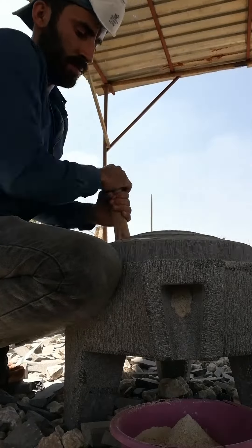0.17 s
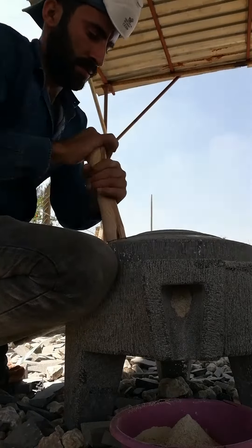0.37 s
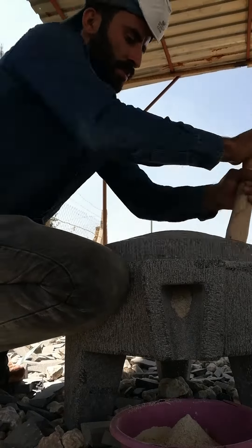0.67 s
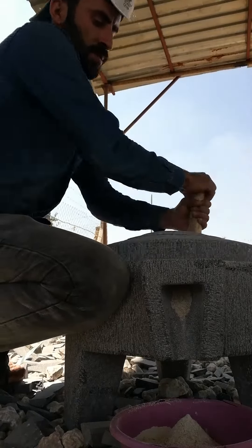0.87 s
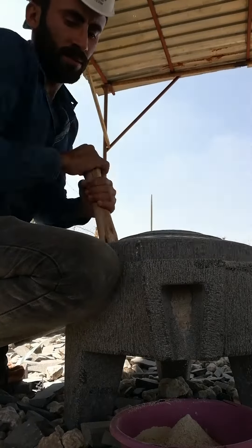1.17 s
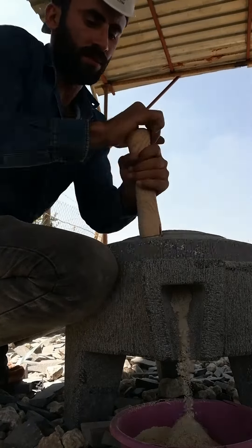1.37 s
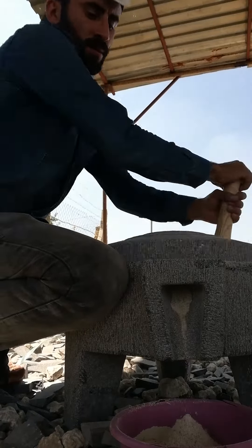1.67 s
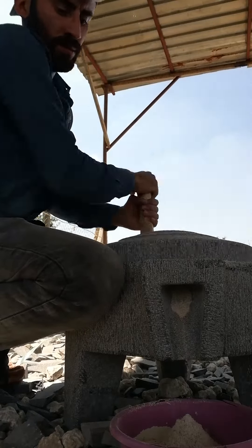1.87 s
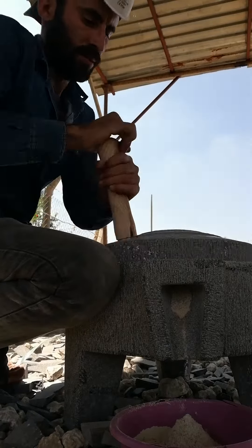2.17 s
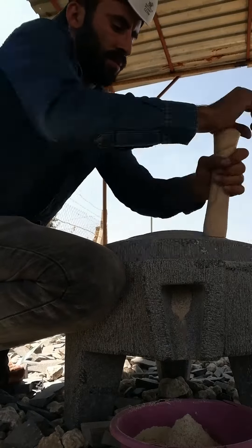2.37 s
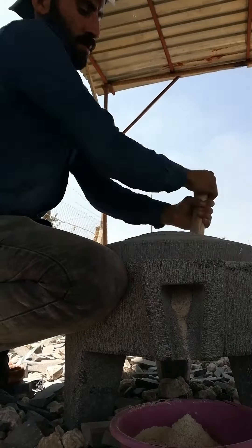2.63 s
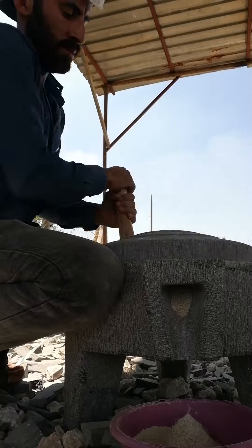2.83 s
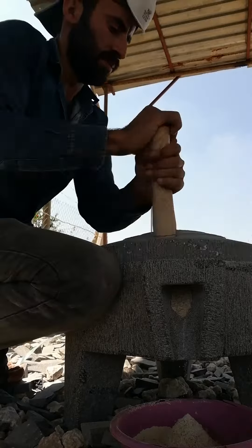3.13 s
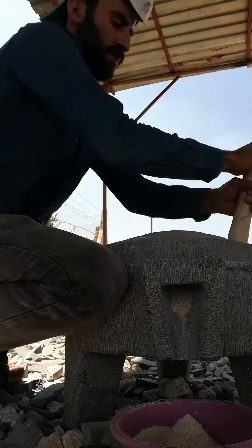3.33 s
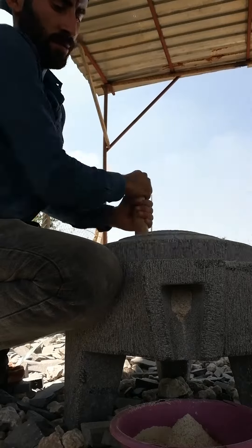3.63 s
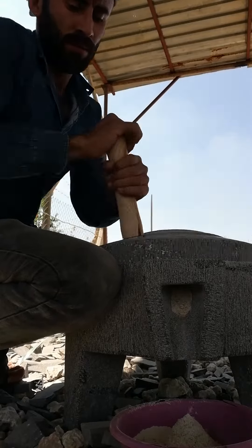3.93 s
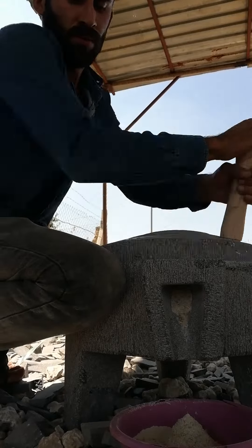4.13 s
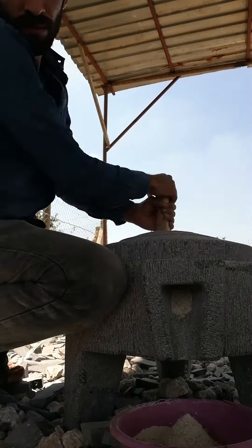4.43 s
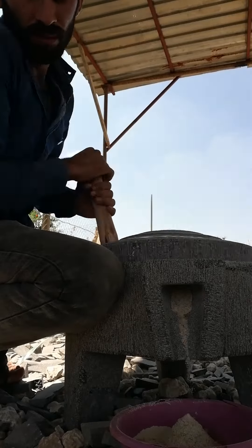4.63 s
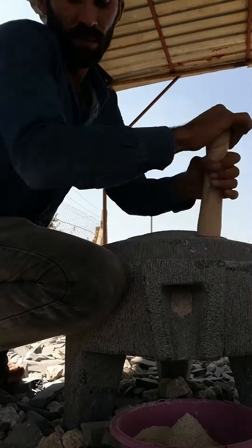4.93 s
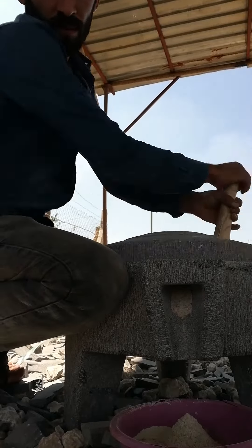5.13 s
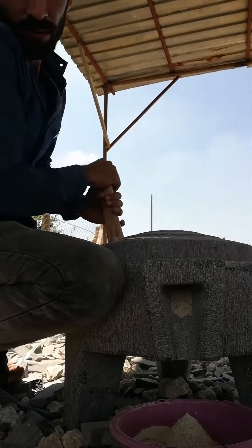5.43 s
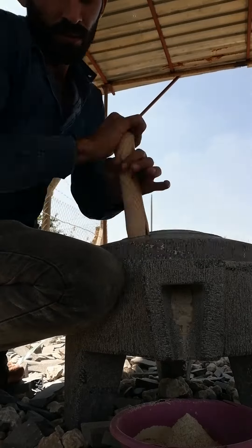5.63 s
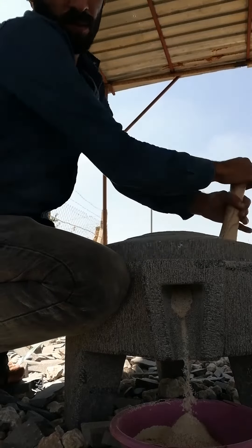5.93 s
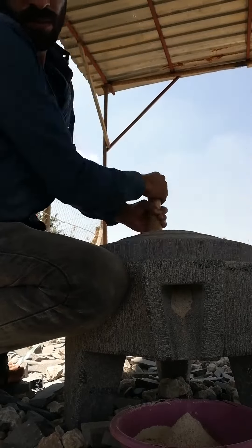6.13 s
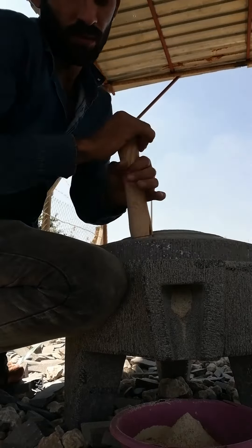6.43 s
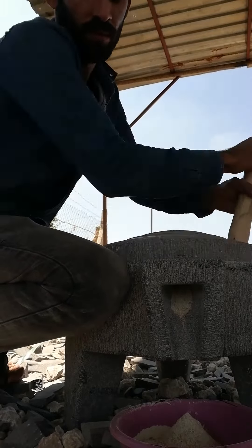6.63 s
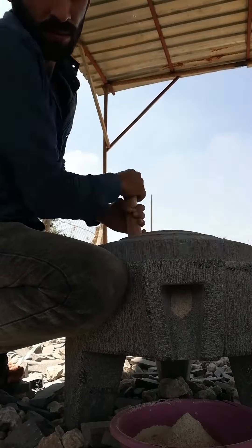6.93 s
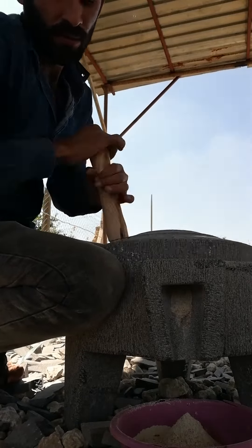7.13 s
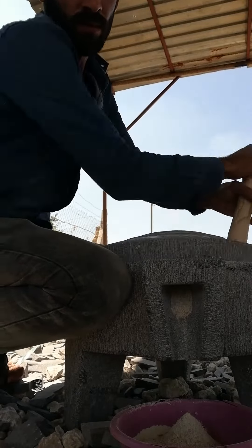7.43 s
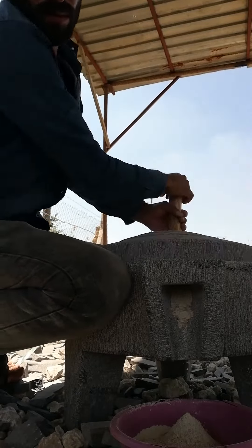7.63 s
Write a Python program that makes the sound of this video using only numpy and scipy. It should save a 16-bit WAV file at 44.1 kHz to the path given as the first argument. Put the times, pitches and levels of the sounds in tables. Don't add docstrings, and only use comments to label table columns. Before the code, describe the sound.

A heavy stone hand mill is cranked steadily, about one turn every 0.8 seconds. Each push and pull brings a swell of coarse, crunchy grinding, hollow low thuds and sharp kernel cracks. Thin stone tones sing unevenly above, a loose pivot ticks once a turn, and fine meal hisses. Close stereo microphones, open shelter, dry with no obvious echo.

```python
import sys
import numpy as np
from scipy import signal
from scipy.fft import rfft, irfft, next_fast_len
from scipy.io import wavfile
from scipy.ndimage import uniform_filter1d

SR = 44100
rng = np.random.default_rng(int(sys.argv[2]) if len(sys.argv) > 2 else 0)


def to_wav(sig):
    pcm = np.clip(np.atleast_2d(sig), -1, 1) * 32767
    pcm = np.round(pcm).astype(np.int16)
    wavfile.write(sys.argv[1], SR, pcm.T)


def volts_from_decibels(level):
    exponent = np.asarray(level, float) / 20
    return 10 ** exponent


N = 343980

# t/s, peak level/dB, thud re peak/dB, bright snap re peak/dB
KERNEL_CRACKS = [(0.035, -26.5, 5.5, 5.5), (0.561, -17, 6, -17), (0.693, -15, 2, -10),
                 (0.769, -17, -6, -14), (0.936, -23.5, 3, 0), (1.513, -8, -14, -5), (1.6, -21, 9, -17),
                 (1.84, -19, -12, -1), (1.855, -18, 1, -25), (2.438, -15.5, 3, -22), (3.297, -17.5, 1, -13),
                 (3.368, -18.5, 3, -14), (3.434, -12, -18, -29), (3.605, -17, -3.5, -2.5),
                 (4.011, -19, 1, -10), (4.05, -18.5, 4, -7), (4.166, -16.5, 2, -9), (4.9, -14.5, 4, -14),
                 (4.917, -14, 1, -27), (5.013, -15, -2, 4.5), (5.112, -19.5, -7, -9), (5.246, -25.5, 2, 0),
                 (5.484, -18, 3.5, -4), (5.636, -15.5, -4, -27), (5.713, -14.5, 4, -9),
                 (5.947, -21, 5, -26), (6.189, -14, -2, -24), (6.282, -24, -19, -1), (6.503, -15.5, 5, -2),
                 (6.954, -18, 9, 1.5), (7.661, -16, -10, -10), (6.064, -29, 1, 6), (6.872, -27, -3, -1)]
# f/Hz, level/dB per Hz
HISS_COLOUR = [(600, -1.5), (1000, -5), (1400, -2.5), (2000, -1), (3300, -1.5), (4400, -6.5), (5450, -10.5),
               (7400, -14), (7750, -10.5), (9300, -9.5), (10500, -13.5), (10900, -17.5), (13000, -25),
               (15600, -29)]
# t/s, length/s, force on upper stone/dB, swell over the stroke/dB, lower stone level/dB
ARM_STROKES = [(0.0, 0.44, -43.5, -17, -38), (0.453, 0.34, -31, 6.5, -37), (0.964, 0.17, -37, -6, -37.5),
               (1.304, 0.36, -31, 12.5, -38.5), (1.86, 0.23, -39, -17, -35.5),
               (2.156, 0.097, -37.5, 10, -35.5), (2.383, 0.21, -31, 1.5, -40),
               (2.697, 0.37, -38.5, -4, -37.5), (3.142, 0.29, -33, 8, -41), (3.625, 0.26, -36.5, -2, -36),
               (4.025, 0.25, -31, -4.5, -39), (4.418, 0.32, -38, 2, -37.5), (4.852, 0.31, -30.5, 1, -37.5),
               (5.377, 0.19, -32, -3, -36.5), (5.663, 0.31, -30, 2, -38.5),
               (6.162, 0.21, -33.5, -13.5, -34.5), (6.44, 0.31, -32, 2.5, -37.5),
               (6.914, 0.083, -29.5, 2, -32.5), (7.057, 0.45, -31.5, 9.5, -35.5),
               (7.673, 0.11, -29.5, 6, -35)]
# t/s, length/s, level/dB
LOOSE_SPELLS = [(0.0, 0.012, -46.5), (0.74, 0.16, -60), (1.696, 0.088, -54.5), (2.62, 0.064, -61),
                (3.46, 0.12, -62), (4.277, 0.048, -58), (5.137, 0.14, -66), (5.97, 0.093, -60),
                (6.745, 0.077, -68), (7.516, 0.067, -58)]
MEAN_FORCE_DB, GRIP_DB = -34, -65.5


def rms_one(x):
    return x / np.sqrt(np.mean(x ** 2) + 1e-20)


def in_time(rows):
    s, *columns = np.transpose(rows)
    return [np.interp(np.arange(N) / SR, s, c) for c in columns]


def at_hz(points, hz, order=1):
    points = np.array(points)
    return np.interp(np.log(hz), np.log(points[:, 0]), points[:, order])


def drift(rate):
    r = np.exp(-80 * np.pi * rate / SR)
    slow = signal.lfilter([1], [1, -2 * r, r * r], rng.standard_normal(N // 40 + 2002))[2000:]
    return np.interp(np.arange(N) / 40, np.arange(len(slow)), rms_one(slow - slow.mean()))


def ring(clicks, hz, width_hz):
    r, w = np.exp(-np.pi * width_hz / SR), 2 * np.pi * hz / SR
    return signal.lfilter([0, np.sin(w)], [1, -2 * r * np.cos(w), r * r], clicks + 1e-18)


def grains(per_s, spread_db):
    sizes = volts_from_decibels(spread_db * np.minimum(rng.exponential(1, N), 4))
    return sizes * (rng.random(N) < per_s / SR)


def struck(rows, strengths):
    clicks = np.zeros(N)
    clicks[[round(row[0] * SR) for row in rows]] = strengths
    return clicks


def pair(both, alike, pan_db):
    alike = np.clip(alike, 0, 1)
    left, right = np.sqrt(1 + alike) * both[0] + np.sqrt(1 - alike) * both[1] * [[1], [-1]]
    return np.array([left * volts_from_decibels(pan_db / 2), right * volts_from_decibels(-pan_db / 2)]) / np.sqrt(2)


def evened(x, span_s, share):
    power = uniform_filter1d(np.mean(x ** 2, axis=0), round(span_s * SR))
    return rms_one(x / (power + 1e-3 * power.mean()) ** (np.clip(share, 0, 1) / 2))


def swells(rows, rest_db, rise, fall):
    t = np.arange(0, N + 64, 64) / SR
    power = volts_from_decibels(2 * rest_db)
    for s, length, db, tilt in rows:
        through = np.clip((t - s) / length, 0, 1) - .5
        before, after = np.maximum(s - t, 0), np.maximum(t - s - length, 0)
        power = power + volts_from_decibels(2 * (db + tilt * through - rise * before - fall * after))
    return np.interp(np.arange(N) / SR, t, 10 * np.log10(power))


def flat(rows):
    return [(*row, 0) for row in rows]


def arm():
    return swells(np.array(ARM_STROKES)[:, :4], rest_db=-46, rise=261, fall=250)


def looseness():
    return swells(flat(LOOSE_SPELLS), GRIP_DB, rise=200, fall=216)


def lull():
    after_s, length_s, depth_db = 0.47, 0.075, -4
    parted = swells([(s + after_s, length_s, 0, 0) for s, _, _ in LOOSE_SPELLS], -33, rise=200, fall=200)
    return depth_db * volts_from_decibels(parted)


def stone_loads():
    lower_rows = [(s, length, db, 0.072 * tilt) for s, length, _, tilt, db in ARM_STROKES]
    lower = swells(lower_rows, rest_db=-47, rise=150, fall=120)
    upper = arm()
    crunch = -44.5 + upper - MEAN_FORCE_DB
    return lower - 2.5, upper - 3.5, crunch


def lobes():
    # t/s, length/s, level/dB
    low_catches = [(0.69, 0.062, -45), (0.91, 0.066, -49), (1.503, 0.16, -48), (1.734, 0.14, -46.5),
                   (2.39, 0.31, -54), (3.28, 0.22, -55), (3.582, 0.059, -51), (4.02, 0.12, -54),
                   (4.218, 0.19, -51), (4.91, 0.14, -49), (5.08, 0.08, -54), (5.918, 0.13, -55),
                   (6.492, 0.11, -54), (6.88, 0.11, -55)]
    mid_catches = [(0.606, 0.037, -50.5), (0.779, 0.042, -44.5), (1.43, 0.32, -51.5), (2.1, 0.25, -57),
                   (2.497, 0.195, -50.5), (3.032, 0.043, -47), (3.435, 0.027, -54), (3.609, 0.011, -56),
                   (4.283, 0.24, -51.5), (5.008, 0.24, -44.5), (5.566, 0.045, -45.5), (5.834, 0.068, -48.5),
                   (6.041, 0.033, -47), (6.346, 0.076, -51), (6.536, 0.076, -47), (6.684, 0.097, -46.5),
                   (7.277, 0.27, -49.5), (7.654, 0.013, -43)]
    high_catches = [(0.08, 0.073, -54), (0.99, 0.12, -59), (1.78, 0.17, -57), (2.86, 0.092, -55),
                    (4.06, 0.047, -51), (4.38, 0.28, -54), (4.96, 0.1, -49), (5.29, 0.19, -52),
                    (5.669, 0.23, -52), (6.1, 0.21, -54), (6.55, 0.098, -50), (6.95, 0.093, -56),
                    (7.28, 0.19, -52), (3.59, 0.054, -55)]
    # level re catch/dB, singing between catches/dB, share of the arm's force
    sing_law = [
        (-3, -60.5, 0.21),
        (-1.5, -55.5, 0.043),
        (0.5, -60.5, 0.14),
    ]
    out, force_db, parting_db = [], arm() - MEAN_FORCE_DB, lull()
    for rows, (catch_db, hum_db, share) in zip((low_catches, mid_catches, high_catches), sing_law):
        caught = catch_db + swells(flat(rows), rest_db=-90, rise=279, fall=235)
        hum = hum_db + share * force_db + 0.8 * parting_db
        out.append(10 * np.log10(volts_from_decibels(2 * caught) + volts_from_decibels(2 * hum)))
    mean_db = np.mean(LOOSE_SPELLS, axis=0)[2]
    shaken = [(s, length, -59 + 0.1 * (db - mean_db), 0) for s, length, db in LOOSE_SPELLS]
    return out + [swells(shaken, rest_db=-66, rise=130, fall=47)]


def high_pings():
    pitches = np.geomspace(6800, 14500, 28)
    hits = rng.random((len(pitches), N)) < 12.0 / SR
    sizes = rng.standard_normal((2, N))
    pings = sum(volts_from_decibels(.7 * at_hz(HISS_COLOUR, hz)) * ring(hit * sizes, hz, 40) for hz, hit in zip(pitches, hits))
    return rms_one(pings) * volts_from_decibels([[-60], [-56]])


def meal():
    # t/s, level/dB
    meal_flow = [(0.0, -54.5), (0.54, -55), (2.11, -55), (2.65, -58), (2.98, -53), (5.26, -55.5),
                 (5.63, -52.5), (6.04, -58), (6.3, -51), (7.8, -56)]
    parting_db = lull()
    dust_db = in_time(meal_flow)[0] + 1.0 - 0.4 * parting_db
    grit_db = -56 + 0.88 * (dust_db - dust_db.mean()) + 0.39 * (looseness() - GRIP_DB) + parting_db
    size = next_fast_len(N)
    hz = np.maximum(np.arange(size // 2 + 1) * SR / size, 1)
    flicker = rng.standard_normal((2, N)) * volts_from_decibels(1.43 * drift(26))
    noise = rfft(flicker, size) * volts_from_decibels(at_hz(HISS_COLOUR, hz))
    place = 3 * np.log2(hz / 650)
    bands = np.zeros((3, 2, N))
    for k in range(15):
        band = irfft(noise * np.clip(1 - abs(place - k), 0, 1), size)[:, :N]
        group = np.searchsorted([10, 13], k, side="right")
        bands[group] += volts_from_decibels(1.3 * drift(7) * (group < 2)) * band
    levels_db = grit_db + 7.5, dust_db + 0.84, 0.35 * dust_db - 49.5
    return sum(volts_from_decibels(db) * rms_one(band) for db, band in zip(levels_db, bands))


def stand():
    # t/s, level/dB
    rumble_level = [(0.0, -39), (0.06, -37), (0.28, -49.5), (1.02, -38), (1.32, -45.5), (1.89, -36.5),
                    (2.02, -50), (2.61, -36), (2.78, -42.5), (4.34, -40.5), (4.78, -45.5), (4.97, -33.5),
                    (5.06, -39.5), (6.71, -42), (6.97, -28.5), (7.1, -42.5), (7.63, -42.5), (7.8, -28)]
    # f/Hz, width/Hz, level/dB
    stand_modes = [
        (42, 10, -9.5),
        (64, 8.6, -2),
        (82.6, 39, -3),
        (111, 26, -6),
    ]
    modes = np.zeros((2, N))
    for hz, width_hz, db in stand_modes:
        shaken = ring(rng.standard_normal((2, N)), hz, width_hz)
        modes += volts_from_decibels(db) * rms_one(ring(shaken, hz, 2.6 * width_hz))
    return volts_from_decibels(in_time(rumble_level)[0]) * evened(modes, 0.29, share=0.97)


def squeaks():
    # t/s, length/s, start f/Hz, end f/Hz, level/dB
    glides = [
        (1.785, 0.145, 11950, 8300, -61),
        (2.18, .08, 9900, 10650, -60),
        (3.55, 0.085, 10600, 9600, -57),
        (5.35, 0.099, 9700, 8500, -58),
        (5.635, .05, 9600, 10050, -52),
        (6.938, 0.059, 10100, 8700, -54),
        (7.115, 0.085, 8600, 9800, -55),
    ]
    out, waver = np.zeros(N), drift(49)
    for s, length, from_hz, to_hz, db in glides:
        on = slice(round(s * SR), round((s + length) * SR))
        through = np.linspace(0, 1, on.stop - on.start)
        hz = from_hz + (to_hz - from_hz) * through + 25 * waver[on]
        fade = np.sqrt(np.sin(np.pi * through) + 1e-9)
        out[on] += fade * volts_from_decibels(db + 1.5 * waver[on]) * np.sin(2 * np.pi * np.cumsum(hz) / SR)
    return out * volts_from_decibels([[3], [-4]])


def pivot():
    # t/s, peak level/dB
    tick_hits = [(0.7008, -37), (1.6661, -35), (1.7674, -40), (1.808, -34), (1.784, -40), (1.796, -40),
                 (1.83, -38), (2.6778, -42), (3.4965, -39), (3.5818, -38), (5.217, -35.5), (5.5682, -51),
                 (0.7251, -40), (0.782, -35), (0.851, -37.5), (1.351, -39), (1.6576, -37.5), (1.719, -40),
                 (1.7366, -36), (2.5686, -32.5), (2.66, -38), (2.688, -35), (3.441, -31.5), (3.531, -32.5),
                 (4.067, -34), (4.276, -30.5), (4.309, -36), (4.373, -33), (4.3997, -34), (4.915, -34),
                 (5.151, -32), (5.246, -35), (5.7144, -43), (5.7468, -42), (5.8287, -32), (5.965, -30.5),
                 (6.0376, -39), (6.7337, -29), (7.5154, -31), (7.5831, -39), (7.641, -34.5)]
    # f/Hz, width/Hz, level/dB, left-right/dB
    pivot_modes = [(5718, 40, 0.5, -14), (6180, 170, -4, 8), (7350, 150, -3.5, -6), (8580, 48, -9, -19),
                   (9010, 47, -8, -14), (11300, 55, -15.5, -12)]
    level_db = looseness()
    chatter = volts_from_decibels(level_db - 3.0) * rms_one(grains(500 * volts_from_decibels(6 * drift(30)), spread_db=1.0))
    r = np.exp(-1 / (0.0026 * SR))
    hits = struck(tick_hits, volts_from_decibels(np.array(tick_hits)[:, 1] - 8.5))
    slips = signal.lfilter([1], [1, -2 * r, r * r], hits) * (1 - r) * np.e
    loose = volts_from_decibels(0.98 * (level_db + 53.5))
    out = np.zeros((2, N))
    for hz, width_hz, db, pan_db in pivot_modes:
        both = rng.standard_normal((2, N))
        unit = np.sqrt(4 * np.pi * width_hz / SR)
        rung = ring((unit * chatter + 0.14 * loose * slips) * both, hz, width_hz)
        out += volts_from_decibels(db) * pair(rung, 0.4, pan_db)
    spray = slips + .9 * uniform_filter1d(chatter, size=130)
    spray = spray * rng.standard_normal((2, N)) * volts_from_decibels([[0], [3]])
    return out + 1.13 * signal.sosfilt(signal.butter(2, [3500, 11000], "band", fs=SR, output="sos"), spray)


def singing():
    # f/Hz, width/Hz, level in family/dB, left-right/dB, likeness 0-1
    stone_modes = [
        [(1566, 71, 2, 4, 1), (1607, 27, 0.5, -6.5, 1)],
        [(2491, 19, 9.5, -2, 0.25), (2537, 9.5, 7.5, 4.5, 0.45), (3635, 56, -4.5, 5, 0.95)],
        [(4066, 42, 7, -19.5, 1), (4097, 24, 9, -7.5, 1), (6610, 41, 0, -6, 0)],
        [(5220, 33, 12, -2, 0.96), (5170, 27, 7, -9, 0.9), (4665, 32, 8.5, 15.5, 0.3), (7980, 28, 4, -2, .5)],
    ]
    # t/s, peak level/dB
    low_kicks = [(0.7834, -34), (0.9074, -40), (1.5918, -36), (1.7396, -37), (1.8182, -33), (2.353, -36.5),
                 (2.49, -37.5), (3.308, -31.5), (6.71, -39), (7.63, -39), (2.9047, -37), (3.2735, -35),
                 (3.4007, -31), (3.583, -31.5), (4.2348, -41), (5.1023, -42), (5.9274, -39), (6.067, -41),
                 (6.8044, -38), (7.3018, -39)]
    mid_kicks = [(1.41, -43), (6.34, -37), (6.98, -39), (6.77, -31.5), (0.176, -42), (0.625, -34),
                 (0.7888, -36), (0.9523, -41), (1.1567, -40), (1.618, -39), (1.657, -34), (1.726, -36),
                 (2.596, -32.5), (3.4451, -30.5), (3.6173, -33), (4.3104, -35), (5.0699, -32.5),
                 (5.145, -37), (5.6256, -38), (5.9144, -40), (7.2873, -35)]
    grit = grains(1500 * volts_from_decibels(3 * drift(25)), spread_db=3.5)
    crack_columns = np.array(KERNEL_CRACKS)
    blows = struck(KERNEL_CRACKS, volts_from_decibels(crack_columns[:, 1] + crack_columns[:, 3] - 10.5))
    out = np.zeros((2, N))
    for db, family in zip(lobes(), stone_modes):
        sound = np.zeros((2, N))
        for hz, width_hz, level_db, pan_db, alike in family:
            wander = volts_from_decibels(level_db + 3.2 * drift(3.9))
            rubbed = rms_one(ring(grit * rng.standard_normal((2, N)), hz, width_hz))
            sound += wander * pair(rubbed, alike, pan_db)
        out += volts_from_decibels(db + 5.0) * evened(sound, 0.051, share=0.7)
    low, mid = (struck(rows, volts_from_decibels(np.array(rows)[:, 1] - 1.5)) for rows in (low_kicks, mid_kicks))
    low_roll, mid_roll = 0.015 * ring(low, 1590, 54), 0.015 * ring(mid, 2510, 54)
    return out + ring(blows + low_roll, 1596, 41) + ring(0.32 * blows + mid_roll, 2515, 29.3)


def thuds():
    # t/s, peak level/dB, f/Hz
    collapse_thuds = [(0.44, -24, 273), (0.485, -19, 283), (0.647, -18, 401), (0.668, -14, 315),
                      (0.968, -26, 230), (0.985, -30, 366), (1.071, -22.5, 260), (1.096, -22, 258),
                      (1.288, -23.5, 300), (1.354, -25, 364), (1.368, -17, 322), (1.393, -18.5, 308),
                      (1.415, -22, 366), (1.429, -23, 283), (1.444, -24, 335), (1.485, -20, 340),
                      (1.532, -20, 382), (1.556, -20, 367), (1.635, -31, 354), (1.652, -24, 314),
                      (1.67, -22, 311), (1.74, -26, 240), (1.842, -22.5, 352), (1.884, -25, 373),
                      (1.911, -26, 270), (1.993, -24.5, 253), (2.215, -27.4, 313), (2.228, -19, 316),
                      (2.248, -22, 317), (2.274, -24.5, 338), (2.359, -23, 282), (2.405, -22, 273),
                      (2.422, -24, 367), (2.506, -19.5, 326), (2.531, -17, 342), (2.871, -23.5, 238),
                      (2.919, -22, 344), (2.984, -25, 253), (3.161, -22, 330), (3.225, -22.5, 316),
                      (3.261, -20, 324), (3.295, -23.5, 303), (3.314, -27, 350), (3.404, -24.2, 410),
                      (3.453, -25, 350), (3.635, -23, 227), (3.669, -19.5, 240), (3.773, -21, 255),
                      (3.854, -21, 224), (4.03, -14.5, 303), (4.075, -14, 338), (4.114, -23, 280),
                      (4.18, -15.5, 326),
                      (4.408, -29, 307), (4.437, -30, 255), (4.5, -21, 312), (4.546, -29.5, 482),
                  (4.605, -20, 203), (4.62, -18.5, 229), (4.632, -21, 248), (4.731, -25.8, 316),
                  (4.862, -22, 334), (4.965, -15, 338), (5.009, -13, 274), (5.032, -17, 387),
                  (5.074, -22, 308), (5.136, -26, 292), (5.168, -28, 385), (5.397, -18, 342),
                  (5.413, -17, 340), (5.508, -25, 288), (5.56, -30, 272), (5.759, -23, 330),
                  (5.875, -15, 332), (5.968, -14.5, 377), (5.983, -22.5, 404), (6.069, -27, 353),
                  (6.135, -25, 336), (6.21, -12.5, 300), (6.239, -20, 268), (6.338, -22.5, 237),
                  (6.457, -22, 250), (6.499, -14.5, 288), (6.555, -17, 325), (6.583, -20, 320),
                  (6.614, -20, 356), (6.632, -18.5, 333), (6.659, -24, 342), (6.747, -23, 456),
                  (6.874, -36, 314), (6.923, -19, 320), (6.946, -30, 335), (7.104, -19.5, 299),
                  (7.271, -17, 367), (7.313, -20.5, 330), (7.376, -15, 298), (7.431, -18, 320),
                  (7.486, -20, 340), (7.497, -23, 383), (7.512, -32, 360), (7.531, -22, 333),
                  (7.678, -31, 266),
                      (0.531, -27, 328), (.582, -15, 387), (.598, -20, 412), (0.753, -27, 368),
                     (5.703, -18, 264), (5.79, -27, 327), (5.808, -27, 327), (5.848, -22, 308),
                     (7.712, -24.5, 330), (7.744, -20, 328)]
    rise_s, thud_db, knock_db, knock_ratio = 0.00602, -2.2, -10.5, 2.1
    rows, t = collapse_thuds, np.arange(round(.06 * SR)) / SR
    out, chance = np.zeros((2, N + SR)), rng.standard_normal((len(rows), 4))
    for (s, db, hz), (side, turn, knock, detune) in zip(rows, chance):
        slow, fast = t / rise_s, 3.0 * t / rise_s
        low = (slow * np.exp(1 - slow)) ** 2 * np.sin(2 * np.pi * hz * t + turn)
        high = fast * np.exp(1 - fast) * np.sin(2 * np.pi * hz * knock_ratio * (1 + 0.1 * detune) * t)
        sound = low + volts_from_decibels(knock_db + 3.6 * knock) * high
        i = max(round((s - rise_s) * SR), 0)
        out[:, i:i + len(t)] += volts_from_decibels(db + thud_db) * sound * [[1], [0.94 * side]]
    return out[:, :N]


def cracks():
    # t/s, peak level/dB
    soft_gives = [(0.611, -23.5), (0.574, -26), (1.442, -27), (1.481, -25), (1.661, -25), (3.158, -39),
                  (2.353, -31), (2.49, -19), (5.689, -30), (5.879, -23), (6.498, -18)]
    # t/s, peak level/dB
    hard_chips = [(.063, -24), (0.81, -21), (.792, -28), (.636, -24), (.968, -31), (2.4, -25), (3.453, -24),
                  (3.617, -24), (3.441, -22), (5.966, -19), (6.175, -21), (6.595, -28), (9.6, -27),
                  (7.717, -21.5), (7.739, -33.5)]
    t = np.arange(round(.05 * SR)) / SR
    kernels = KERNEL_CRACKS + [(s, db, 5, -17) for s, db in soft_gives]
    kernels += [(s, db, -7.5, -27) for s, db in hard_chips]
    out, chance = np.zeros((2, N)), rng.standard_normal((len(kernels), 3, len(t)))
    for (s, db, thud_db, snap_db), noise in zip(kernels, chance):
        force = 0.096 * noise[:2] * np.exp(-t / 0.0085)
        force[:, 0] += [1, .5 * noise[2, 9]]
        first = force * (t == 0)
        detune = 1 + 0.07 * noise[2]
        swell = 2.52 * (t / 0.003 * np.exp(1 - t / 0.0026)) ** 2
        thud = swell * np.sin(2 * np.pi * 335 * detune[0] * t) * force[:, :1]
        knock = ring(force, 600 * detune[3], 240) - ring(force, 800 * detune[4], 237)
        snap = ring(force, 1050 * detune[5], 180) + ring(force, 1350 * detune[6], 250)
        snap = snap - ring(force, 1190 * detune[7], 220)
        push = volts_from_decibels(5.0) * ring(first, 860, 580) + volts_from_decibels(snap_db + 3.0) * ring(first, 890, 810)
        sound = push + volts_from_decibels(thud_db - 5.5) * thud + knock + volts_from_decibels(snap_db - 6.0) * snap
        i = round(s * SR)
        out[:, i:i + len(t)] += volts_from_decibels(db - 0.5) * sound[:, :N - i]
    return signal.sosfilt(signal.butter(3, [150, 1800], "band", fs=SR, output="sos"), out)


def crushing():
    # f/Hz, level/dB per Hz
    body_colour = [(71, -41), (120, -12.5), (158, 0), (292, -1.5), (327, 2.5), (521, -8), (637, -8),
                   (884, -21), (1080, -23.5), (1390, -44), (1500, -33), (1950, -55), (3300, -120)]
    kernels = grains(560 * volts_from_decibels(3.5 * drift(14)), spread_db=3.5)
    at = np.flatnonzero(kernels)
    push = rng.choice([-1, 1], (2, len(at)))
    bands = np.zeros((3, 2, N))
    for k, hz in enumerate(np.geomspace(125, 1450, 18)):
        clicks = np.zeros((2, N))
        clicks[:, at] = kernels[at] * ((-1) ** k * push + 1.03 * rng.standard_normal((2, len(at))))
        mode = rms_one(ring(ring(clicks, hz, 0.13 * hz), hz, 0.63 * hz))
        bands[np.searchsorted([260, 500], hz)] += volts_from_decibels(at_hz(body_colour, hz)) * np.sqrt(hz) * mode
    return sum(volts_from_decibels(db + 2.0) * evened(band, 0.042, share=0.41) for db, band in zip(stone_loads(), bands))


def ports(both):
    # f/Hz, left-right/dB, likeness 0-1, left lead/rad
    port_law = [(59.6, 0, 1, 0.15), (151, 0.5, 0.97, -0.46), (342, -1, 0.8, -0.74), (620, -6.5, 0.6, -1.16),
                (920, -1, 0.09, -0.53), (1100, 1, 0.85, -0.5), (2000, -0.5, 0, -1.5),
                (4400, -3, 0.26, 0.97), (8500, -8, 0.02, -0.36), (10300, 2.5, 0.06, -0.16),
                (14000, -16, 0, 0)]
    size = next_fast_len(N)
    hz = np.maximum(np.arange(size // 2 + 1) * SR / size, 1)
    left, right = pair(rfft(both, size), at_hz(port_law, hz, order=2), at_hz(port_law, hz, order=1))
    turn = np.exp(.5j * at_hz(port_law, hz, order=3))
    return irfft(np.array([left * turn, right / turn]), size)[:, :N]


def scene():
    mill = meal() + stand() + thuds() + cracks() + crushing()
    ringing = high_pings() + squeaks() + pivot() + singing()
    return ports(mill) + ringing


def low_pass(x):
    return signal.sosfilt(signal.butter(12, 15780, fs=SR, output="sos"), x)


def record(dry):
    rounded = 0.5 * np.tanh(dry / 0.5)
    low_cut = signal.sosfilt(signal.butter(2, 40, "high", fs=SR, output="sos"), rounded)
    top_cut = signal.sosfilt(signal.ellip(10, .5, 60, 15710, fs=SR, output="sos"), low_cut)
    return low_pass(top_cut)


dry = scene()
out = record(dry)
to_wav(out)
```